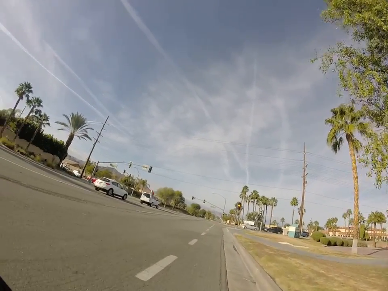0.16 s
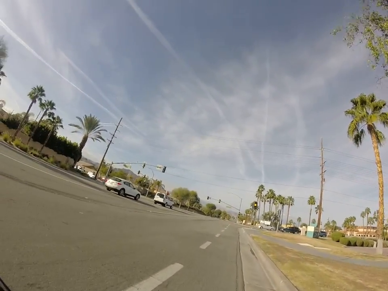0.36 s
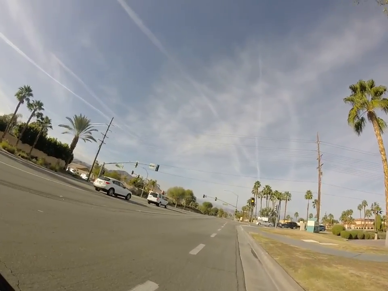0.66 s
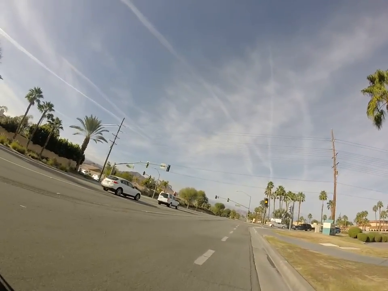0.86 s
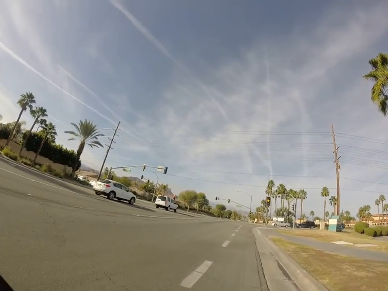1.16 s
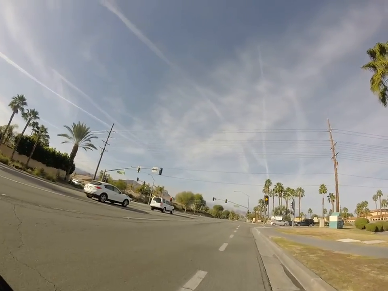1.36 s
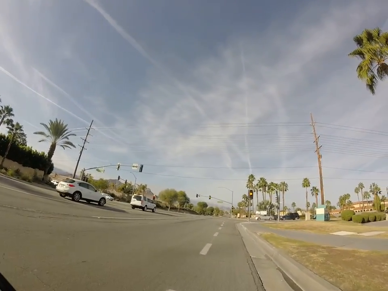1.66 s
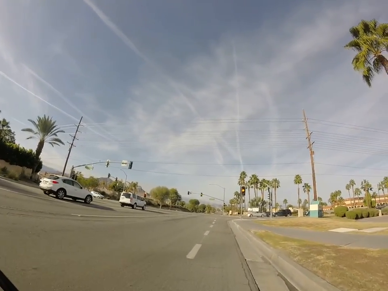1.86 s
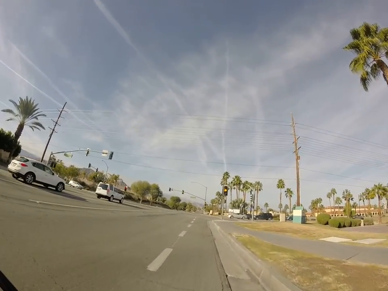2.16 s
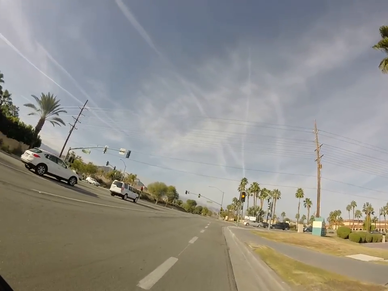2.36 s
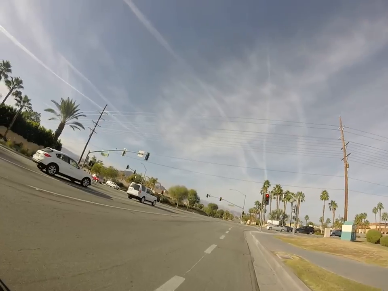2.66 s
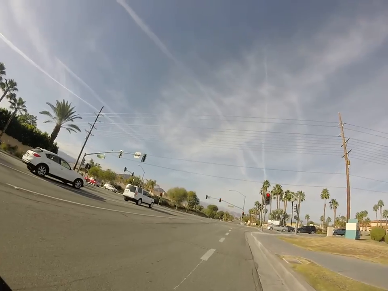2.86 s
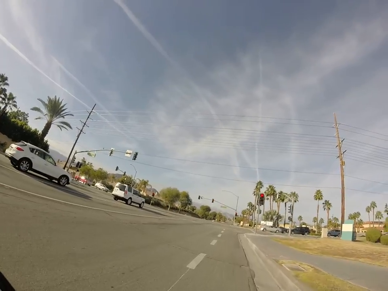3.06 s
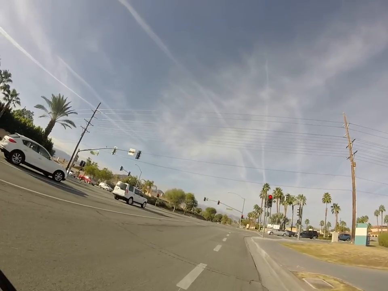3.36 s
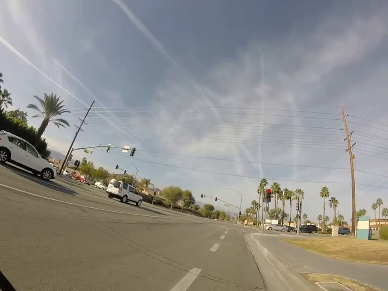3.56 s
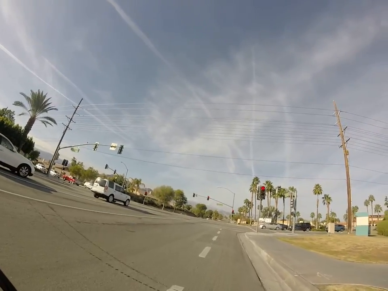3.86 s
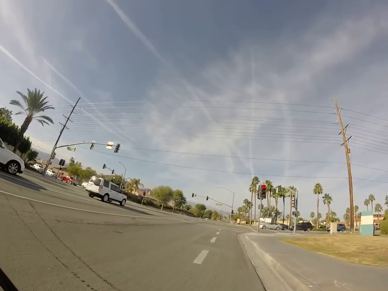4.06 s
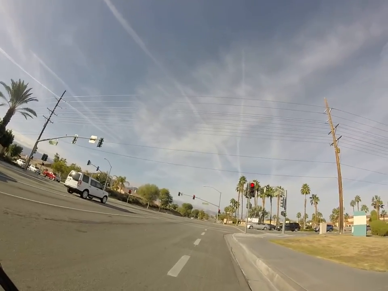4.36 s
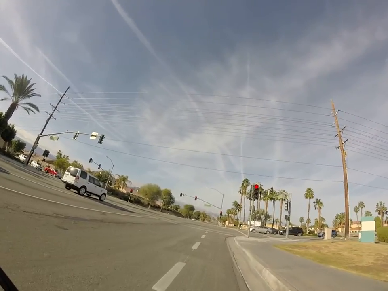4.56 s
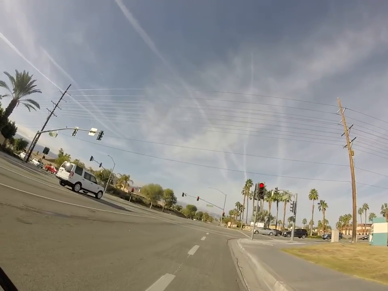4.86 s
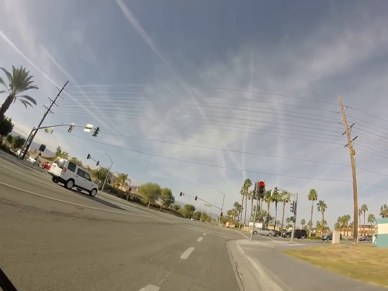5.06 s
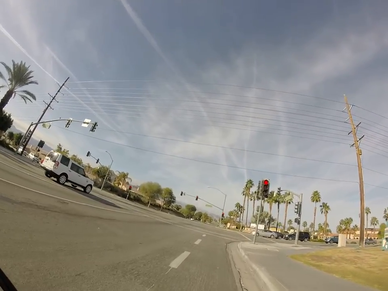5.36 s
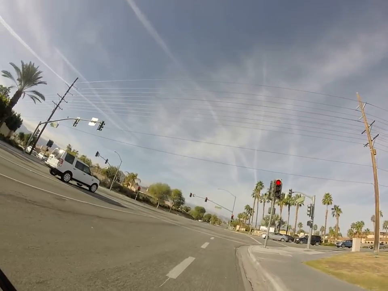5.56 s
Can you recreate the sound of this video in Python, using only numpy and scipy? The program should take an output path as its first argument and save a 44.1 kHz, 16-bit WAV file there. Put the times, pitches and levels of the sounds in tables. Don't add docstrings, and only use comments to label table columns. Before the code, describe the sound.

Muffled wind thuds and coarse road rumble on a moving bicycle, with hard knocks, plastic rattles and sharp clacks, then a ticking freewheel.

```python
import sys
import numpy as np
from scipy import signal
from scipy.fft import rfft, irfft, next_fast_len
from scipy.io import wavfile
from scipy.ndimage import uniform_filter1d

SR = 44100
rng = np.random.default_rng(int(sys.argv[2]) if len(sys.argv) > 2 else 0)


def attenuation_scalar(level_db):
    decades = np.asarray(level_db, float) / 20
    return 10 ** decades


def to_wav(sig):
    pcm = np.clip(np.atleast_2d(sig), -1, 1) * 32767
    pcm = np.round(pcm).astype(np.int16)
    wavfile.write(sys.argv[1], SR, pcm.T)


N = 251811
T = np.arange(N) / SR
BLOW_T = T[:4096]

# start in seconds, gust level in dB.
GUST_LEVELS = [(0, -24), (.25, -33), (.5, -26), (.8, -25.5), (1.1, -26), (1.5, -23), (1.75, -25.5),
               (2.33, -27), (2.36, -41.5), (3.0, -35), (3.3, -35), (3.5, -37.5), (3.95, -27), (4.2, -31),
               (4.58, -23.5), (4.72, -29), (5.05, -26.5), (5.71, -31)]
# frequency in Hz, density in dB.
EDDY_SPECTRUM = [(12, -13.5), (25, -6), (45, 3), (70, -6.5), (110, -8.5), (200, -19), (400, -51),
                 (1500, -110)]
SHAKE_SPECTRUM = [(40, -33), (80, -6), (140, -3), (200, -1), (280, -14.5), (360, -14), (500, -27.5),
                  (800, -36), (1500, -51.5), (3000, -110)]
HISS_SPECTRUM = [(1000, 0.5), (2500, -0.5), (5000, -7.5), (6500, -3), (9000, -2.5), (12500, 1.5),
                 (15000, 1), (17000, -46)]
# start in seconds, grain level in dB, chatter level in dB.
ROAD_SURFACES = [
    (0, -31, -52),
    (.6, -27.5, -54),
    (2.02, -30.5, -53.5),
    (2.345, -56, -62),
    (2.64, -56, -54),
    (3.49, -34, -50.5),
    (3.66, -31, -54),
    (4.25, -32.5, -54),
    (4.66, -32.5, -55.5),
    (5.25, -34.5, -57),
]

# frequency in Hz, level in dB, decay time t60 in seconds.
HOUSING_MODES = [(675, -5.5, 0.023), (959, 8, 0.013), (1200, -1, 0.031), (1683, 3, 0.015),
                 (2378, -10.5, 0.029), (2630, 3.5, 0.011), (2987, -4, 0.016), (3340, -13, 0.011),
                 (4320, -10, 0.0072), (5400, -6, 0.0055), (6210, -44.5, 0.02), (7820, -22, 0.013),
                 (9700, -27, 0.0073), (11770, -25.5, 0.0095)]
HUB_MODES = [(1755, -4, 0.031), (2510, 0.1, 0.027), (3100, 1, 0.015), (3500, -7.5, .015),
             (4370, -6.5, .018), (5250, -4.5, 0.012), (5400, 3.5, 0.017), (5900, -3.5, 0.022),
             (7640, -3, 0.018), (8100, -9, .01)]
CLAMP_MODES = [(745, -13.5, 0.024), (998, -5, 0.0084), (1690, -1.5, 0.014), (2735, 4, 0.0068),
               (3390, -10, 0.01), (4410, -9, 0.008), (5520, -19, 0.0066), (7280, -14.5, 0.0046),
               (10200, -18, .003), (12800, -20, .003)]
FRAME_MODES = [(1060, 2, 0.18), (1222, -8.5, .12), (2261, -3, 0.18), (2686, -7.5, .09)]

# start in seconds, peak in dB, length in ms.
SCUFF_EVENTS = [(0.0934, -38.5, 16), (0.145, -40.5, 23), (.36, -43, 13), (.3794, -48, 27), (.42, -46, 14),
                (.49, -43.5, 23), (0.5676, -40.5, 14), (.7194, -47, 39), (1.125, -38.5, 16),
                (1.274, -39.5, 24), (1.8706, -47, 22), (1.975, -39.5, 30), (2.049, -40, 11),
                (2.1288, -38, 10.3), (2.181, -43.5, 20), (2.252, -42.5, 21), (2.339, -45, 19),
                (4.07, -41, 19), (4.312, -40, 22), (4.4169, -42.5, 18), (4.574, -36, 24), (4.588, -35, 12),
                (4.604, -35, 14), (4.6453, -41, 13), (4.731, -45, 27), (5.51, -58, 17)]
# start in seconds, peak in dB, length in ms.
SLAP_EVENTS = [(2.4339, -55, 38), (2.5044, -46, 22), (2.5676, -42, 35), (2.6624, -37.5, 25.5),
               (2.703, -36, 12.5), (2.764, -34.5, 28), (2.7986, -43.5, 15), (2.854, -38, 8.7),
               (2.8883, -40.5, 19), (2.94, -40, 19), (2.9565, -36.5, 27), (2.999, -43.5, 13),
               (3.0444, -41, 40), (3.076, -34, 14), (3.1136, -42.5, 21), (3.1594, -46, 16),
               (3.2141, -46, 20), (3.2536, -38.5, 30), (3.2914, -48, 32), (3.3134, -44.5, 17),
               (3.385, -50, 12), (3.413, -42, 10), (3.43, -39.5, 17.4), (3.4552, -34, 14.4),
               (3.5064, -39, 18), (3.559, -35.5, 20), (3.577, -42.5, 33), (3.608, -34, 18),
               (3.625, -34, 15.5)]
# start in seconds, peak in dB, hardness in dB per octave,
# panel mode in dB.
KNOCK_EVENTS = [(.06, -23.5, 4, 2), (.082, -33, 2, 5), (.137, -24.5, -2, -2), (.169, -27, .5, 4),
                (.236, -33, 8, 6), (.47, -31, -8, -7), (.555, -22.5, -0.5, -1), (.612, -26, -2, -5),
                (.838, -27, -9, 0), (1.301, -30, -4, 2), (1.427, -26, -8.5, 2), (1.466, -26.5, 3.5, -2.5),
                (2.182, -22.5, -0.5, 2), (2.331, -26.5, 2, 1.5), (2.6, -27, -11, -1), (2.752, -28, 2, -5),
                (2.948, -31, -1, -4), (5.63, -29.5, -4, 2), (5.6708, -22, -4, 8)]
# start in seconds, peak in dB, hardness in dB per octave.
TAP_EVENTS = [(.396, -45, -9), (.549, -30, -2), (.562, -38, -1), (.821, -47, -9), (.969, -38, -7),
              (1.125, -29.5, -1), (1.275, -39, -15), (1.422, -34, -8), (1.433, -32, -13), (1.481, -34, -3),
              (1.528, -38, -11), (1.603, -35.5, 1), (2.228, -38, -1), (2.315, -41, 8), (2.538, -42, 1),
              (2.838, -38, -4), (3.04, -34, -17), (3.058, -41, 2), (3.249, -31.5, 0), (3.886, -32.5, -6),
              (5.305, -47, -4), (5.61, -32.5, -10), (5.638, -34, -3), (5.684, -34, 4)]
# start in seconds, peak in dB, hardness in dB per octave,
# panel mode in dB, rim modes in dB.
BLOW_EVENTS = [(.7596, -11, 3, 2, -3), (4.574, -30, -4, -6, 0), (4.291, -40, 0, 0, 3),
               (1.985, -17.5, 4, 2.5, -2), (4.468, -38, 3, 0, 3), (3.569, -11.5, 0, -4, 4.5),
               (3.673, -12, -3.5, -10, 4), (3.74, -13, 2.5, -4, -2), (4.602, -24, -8, -6, 0)]
# centre in seconds, peak in
# dB, direction, length in ms.
JOLT_EVENTS = [(0.822, -17, 1, 3), (1.195, -25, 1, 2.4), (1.245, -24, 1, 1.7), (1.464, -12.5, 1, 3.1),
               (1.573, -23, 1, 5.5), (1.824, -20, 1, 3.6), (1.956, -23, -1, 3.6), (1.99, -18, -1, 3.1),
               (2.007, -16.5, -1, 2.2), (2.131, -14, 1, 3.7), (2.156, -19, -1, 2.9), (2.174, -18.5, 1, 2.9),
               (2.257, -23, 1, 5.3), (3.452, -23, 1, 2.5), (3.504, -17.5, 1, 4.2), (3.54, -20.5, -1, 1.9),
               (3.607, -14.5, 1, 2), (4.083, -16.5, 1, 2.6), (4.566, -19, 1, 2.4), (4.594, -16.5, -1, 2),
               (4.602, -18, 1, 1.9),
               (2.682, -24, -1, 1.4), (2.7, -29, -1, 1.4), (2.718, -25, 1, 2.6), (2.745, -25, 1, 1.75),
               (2.765, -17.5, 1, 2), (2.795, -29.5, -1, 1.6), (2.821, -21.5, 1, 2.5), (2.838, -23, 1, 2.1),
               (2.883, -20, 1, 2.55), (2.916, -22.5, -1, 2.9), (2.951, -20.5, 1, 1.66),
               (2.982, -25, -1, 5.7), (3.016, -25.5, 1, 2.5), (3.041, -26.5, -1, 1.6),
               (3.061, -19.5, 1, 1.76), (3.097, -18, 1, 3.1), (3.107, -26, -1, 1.44), (3.127, -21, 1, 2.6),
               (3.153, -24.5, -1, 2), (3.189, -24, 1, 2.5), (3.203, -23, -1, 2.1), (3.223, -23.5, 1, 2.25),
               (3.25, -25, -1, 5.1), (3.287, -20.5, 1, 1.9), (3.328, -19, -1, 2.14), (3.343, -24, -1, 3.1),
               (3.354, -28, 1, 1.2), (3.366, -21.5, -1, 3.4), (3.401, -24, 1, 1.63),
               (3.428, -20.5, -1, 3.3)]
# start in seconds, peak in dB, direction,
# decay time t60 in seconds, crack in dB.
THUMP_EVENTS = [
    (.061, -18, -1, 0.093, -46),
    (0.2076, -5.5, 1, 0.036, -12.5),
    (0.2639, -12, 1, 0.036, -18.5),
    (0.3071, -4, 1, 0.032, -11.5),
    (0.3469, -15, 1, .052, -23),
    (0.7603, -14, -1, 0.11, -46),
    (3.6197, -2.5, 1, 0.024, -3.5),
    (3.6722, -14, -1, 0.066, -29),
    (4.6186, -5.5, 1, 0.033, -30),
    (5.6705, -14, 1, .03, -34),
]
# start in seconds, peak in dB, brightness in dB per octave.
CLINK_EVENTS = [(2.7053, -42, 3), (2.7397, -53, 3), (2.7487, -50, 3), (2.7537, -45, 3), (2.7711, -42, 3),
                (2.8544, -53, 3), (2.8544, -46, 3), (2.8904, -47, 3), (2.9392, -44, 3), (2.9607, -44, 3),
                (2.9607, -40, 3), (2.9981, -49, 3), (3.0365, -53, 3), (3.0505, -48, 3), (3.0689, -44, 3),
                (3.1148, -48, 3), (3.2151, -54, 3), (3.2271, -48, 3), (3.258, -47, 3), (3.263, -45, 3),
                (3.3119, -51, 3), (3.3583, -55, 3), (3.3882, -53, 3), (3.4167, -47, 3), (3.4361, -43, 3),
                (3.4596, -42, 3), (3.4925, -51, 3), (3.5129, -46, 3), (3.5439, -46, 3), (3.5683, -37, 3)]
# start in seconds, peak in dB, # brightness in dB per
PAWL_EVENTS = [(4.6468, -55, -3), (4.6957, -50, -3), (4.7292, -53, -3), (4.7594, -54, -3), (4.787, -51, -3),
               (4.8115, -53, -3), (4.8359, -55, -3), (4.8604, -51, -3), (4.8828, -52, -3),
               (4.9048, -54, -3), (4.9262, -55, -3), (4.9487, -53, -3), (4.9706, -54, -3), (4.998, -54, -3),
               (5.0275, -54, -3), (5.0599, -54, -3), (5.0883, -55, -3), (5.1193, -53, -3),
               (5.1522, -54, -3), (5.1911, -50, -3), (5.226, -55, -3), (5.2714, -50, -3), (5.3183, -55, -3),
               (5.3627, -48, -3), (5.4066, -52, -3), (5.4465, -51, -3), (5.4844, -53, -3),
               (5.5204, -51, -3), (5.5538, -52, -3), (5.5827, -52, -3), (5.6121, -55, -3),
               (5.6441, -57, -3), (5.658, -52, -3), (5.676, -51, -3)]
# frequency in Hz, level in dB, decay time t60 in seconds.
LEVER = [(720, -2, .014), (1135, 3, .017), (1700, -10, .02), (2100, -10, .015), (2575, 7, .008),
         (2850, -4, .008), (3540, -20, .02), (5150, 0, .004), (7700, -18, .005), (11000, -14, .004)]
CABLE = [(945, -4, .012), (1250, -8, .025), (2000, 0, .01), (2700, -4, .012), (3060, 3, .007),
         (4200, -4, .007), (4860, -14, .01), (5700, -10, .005), (7600, -18, .004)]
STEM = [(290, -7, .008), (480, -7, .01), (740, -4, .01), (954, 0, .012), (1250, -7, .018), (1760, 4, .007),
        (2230, -10, .012), (2850, 3, .006), (3400, -14, .008), (4000, -22, .006), (4920, -20, .01),
        (5500, -14, .006), (5900, -15, .007), (7800, -16, .005)]
# start in seconds, peak in dB, modes of the part,
# hardness in dB per octave.
CLACK_EVENTS = [
    (1.3465, -16, CABLE, 0),
    (1.5427, -15, LEVER, -2),
    (2.6478, -1, STEM, 0),
    (4.6182, -6, LEVER, 0),
]

FRAME_DB = -28


def unit(x):
    return x / np.sqrt(np.mean(x ** 2))


def walk(rate):
    hold = int(SR / rate)
    steps = np.repeat(rng.standard_normal(N // hold + 1), hold)
    slewed = uniform_filter1d(uniform_filter1d(steps, hold), hold)
    return unit(slewed[:N])


def colour(x, points):
    hz, db = np.transpose(points)
    size = next_fast_len(N)
    log_hz = np.log(np.fft.rfftfreq(size, 1 / SR) + 1)
    gain = attenuation_scalar(np.interp(log_hz, np.log(hz), db))
    return unit(irfft(rfft(x, size) * gain, size)[:N])


def decay(t, t60):
    return np.exp(-np.log(1000) * t / t60)


def ring(modes, tilt_db=0., stretch=0.91, detune=0.):
    hz, db, t60 = np.transpose(modes)[:, :, None]
    gain = attenuation_scalar(db + tilt_db * np.log2(hz / 1500))
    sines = np.sin(2 * np.pi * hz * (1 + detune) * BLOW_T)
    return np.sum(gain * sines * decay(BLOW_T, t60 * stretch), axis=0)


def add(out, s, x, db):
    i = max(int(s * SR), 0)
    out[i:i + len(x)] += (x * attenuation_scalar(db) / np.max(np.abs(x)))[:N - i]


def wind(buffet_db, hiss_db):
    gusts_db = 0.92 * walk(8.1) + 0.78 * walk(40)
    eddies = colour(rng.standard_normal(N), EDDY_SPECTRUM)
    eddies = unit(eddies / uniform_filter1d(eddies ** 2, SR // 12) ** .3)
    hiss = colour(rng.standard_normal(N), HISS_SPECTRUM) * attenuation_scalar(hiss_db + gusts_db + 17.0)
    return colour(eddies, [(150, 0.5), (600, -45)]) * attenuation_scalar(buffet_db) + hiss


def road(shake_db):
    struck = rng.random(N) < 450 / SR
    grains = rng.standard_normal(N) * struck * attenuation_scalar(0.97 * rng.exponential(size=N))
    return colour(grains, SHAKE_SPECTRUM) * attenuation_scalar(shake_db + 0.45 * walk(34))


def rattle(rattle_db):
    scuff_metal_db, slap_metal_db = 0, 4
    specks_per_s, speck_db, chain_db = 70, -7, -16.5
    fizz_db = -24

    chatter = unit(rng.standard_normal(N) * attenuation_scalar(1.5 * rng.exponential(size=N)))
    other_chatter = chatter[::-1]
    scuffs, slaps, airborne = np.zeros((3, N))
    events = [(*scuff, scuff_metal_db) for scuff in SCUFF_EVENTS]
    events += [(*slap, slap_metal_db) for slap in SLAP_EVENTS]
    for s, db, ms, metal_db in events:
        shape = np.hanning(int(max(ms, 4) * SR / 1000)) ** 0.18
        add(scuffs, s, shape, db - 6.5)
        add(airborne, s, shape, db - 1.5 * metal_db - 6.5)
        add(slaps, s, shape, db + metal_db - 20.5)

    def through(drive, modes, tilt_db, stretch):
        return signal.fftconvolve(drive, unit(ring(modes, tilt_db, stretch)))

    soft = through(chatter * attenuation_scalar(rattle_db + 3.3 * walk(40)), HOUSING_MODES, 0.55, 0.33)
    hard = through(chatter * scuffs, HOUSING_MODES, 11.1, 0.23)
    slapped = through(other_chatter * slaps, HUB_MODES, 11.0, 0.44)
    specks = unit((rng.random(N) < specks_per_s / SR) * rng.standard_normal(N))
    ticks = through(specks * attenuation_scalar(rattle_db + speck_db), HOUSING_MODES, 3.5, 0.87)
    whirr_level = attenuation_scalar(rattle_db + chain_db + 2.2 * walk(15))
    whirr = through(other_chatter * whirr_level, HUB_MODES, 4.5, 0.6)
    fizz = colour(chatter, HISS_SPECTRUM) * airborne * attenuation_scalar(fizz_db)
    return (soft + hard + slapped + ticks + whirr)[:N] / 64 + fizz


def knocks():
    tap_panel_db, build_ms = -5.5, 0.48
    panel_hz, rim_hz = 1730, 2500
    ring_stretch, damp_per_db = 0.5, 0.02

    out = np.zeros(N)
    hits = BLOW_EVENTS + [(*knock, 0) for knock in KNOCK_EVENTS]
    hits = hits + [(*tap, tap_panel_db, 0) for tap in TAP_EVENTS]
    detune = .012 * rng.standard_normal((len(hits), len(HOUSING_MODES), 1))
    grit = rng.standard_normal((len(hits), 400))
    build = 1 - np.exp(-BLOW_T * 1000 / build_ms)
    for (s, db, tilt_db, panel_db, rim_db), shift, noise in zip(hits, detune, grit):
        modes = []
        for hz, mode_db, t60 in HOUSING_MODES:
            panel = panel_db * np.exp(-(np.log2(hz / panel_hz) / 0.16) ** 2)
            rim = rim_db * np.exp(-(np.log2(hz / rim_hz) / 0.17) ** 2)
            modes.append((hz, mode_db + panel + rim, t60))
        blow = ring(modes, tilt_db, ring_stretch - damp_per_db * db, shift) * build
        contact = 0.032 * attenuation_scalar(-.6 * tilt_db) * noise * np.exp(-BLOW_T[:400] / 0.0018)
        contact[0] += 1
        add(out, s, signal.fftconvolve(contact, blow), db - 0.64)
        hum = ring(FRAME_MODES, 0, 0.88, shift[:len(FRAME_MODES)])
        add(out, s, hum, db + FRAME_DB + .8 * panel_db)
    return out


def bumps():
    swing_hz, stiffen_hz_per_db = 152, 0.57
    pushes, swings = np.zeros(N), np.zeros(N)
    for s, db, direction, ms in JOLT_EVENTS:
        push = np.hanning(int(max(ms, .5) * SR / 450)) ** 0.98
        add(pushes, s - len(push) / SR / 2, np.sign(direction) * push, db + 3.0)
    onset = 1 - np.exp(-BLOW_T / .00015)
    crack = ring(CLAMP_MODES) * (1 - np.exp(-BLOW_T / 0.00066))
    for s, db, direction, t60, crack_db in THUMP_EVENTS:
        hz = swing_hz + stiffen_hz_per_db * db
        swing = np.cos(2 * np.pi * hz * BLOW_T - .9) * decay(BLOW_T, t60) * onset
        add(swings, s, np.sign(direction) * swing, db)
        add(swings, s, np.sign(direction) * crack, crack_db)
    leak = signal.butter(2, 45., "high", fs=SR, output="sos")
    return signal.sosfilt(leak, pushes) + swings


def clacks():
    snap_ms = .5
    out = np.zeros(N)
    build = 1 - np.exp(-BLOW_T * 1000 / snap_ms)
    for s, db, part, tilt_db in CLACK_EVENTS:
        add(out, s, ring(part, tilt_db) * build, db)
        add(out, s, ring(FRAME_MODES), db + FRAME_DB)
    return out


def freewheel():
    tick_db, clink_db, tick_lead_s = 14, 4, .001
    out = np.zeros(N)
    ticks = [(s - tick_lead_s, db + tick_db, tilt_db) for s, db, tilt_db in PAWL_EVENTS]
    ticks += [(s, db + clink_db, tilt_db) for s, db, tilt_db in CLINK_EVENTS]
    for s, db, tilt_db in ticks:
        scatter_db = 1.5 * rng.standard_normal(len(HUB_MODES))
        modes = [(hz, mode_db + d, t60) for (hz, mode_db, t60), d in zip(HUB_MODES, scatter_db)]
        bounce = rng.standard_normal(500) * np.exp(-BLOW_T[:500] / 0.004)
        add(out, s, signal.fftconvolve(bounce, ring(modes, tilt_db)), db)
    return out


def scene():
    hiss_db, change_ms = -72.3, 5
    from_s, *levels = np.transpose(ROAD_SURFACES)
    surface = np.searchsorted(from_s[1:], T)
    change = int(change_ms * SR / 1000)
    shake_db, rattle_db = (uniform_filter1d(db[surface], change) for db in levels)
    buffet_db = np.interp(T, *np.transpose(GUST_LEVELS))
    carried = wind(buffet_db, hiss_db) + road(shake_db) + rattle(rattle_db)
    struck = knocks() + bumps() + clacks() + freewheel()
    return (carried + struck)[None]


def low_pass(x):
    return signal.sosfilt(signal.butter(12, 15100, fs=SR, output="sos"), x)


def record(dry):
    wall_hz = 4430
    duck_s, duck_db, duck_ms, recover_s = 3.652, -8, 9.1, 0.26
    since = np.maximum(T - duck_s, 0)
    attack = 1 - np.exp(-since * 1000 / duck_ms)
    recovery = np.exp(-(since / recover_s) ** 1.46)
    dry = dry * attenuation_scalar(duck_db * attack * recovery)
    wall = signal.butter(2, wall_hz, fs=SR, output="sos")
    start = dry[:, :1]
    muffled = signal.sosfilt(wall, dry - start) + start
    return low_pass(np.clip(muffled, -1, 1))


dry = scene()
out = record(dry)
to_wav(out)
```